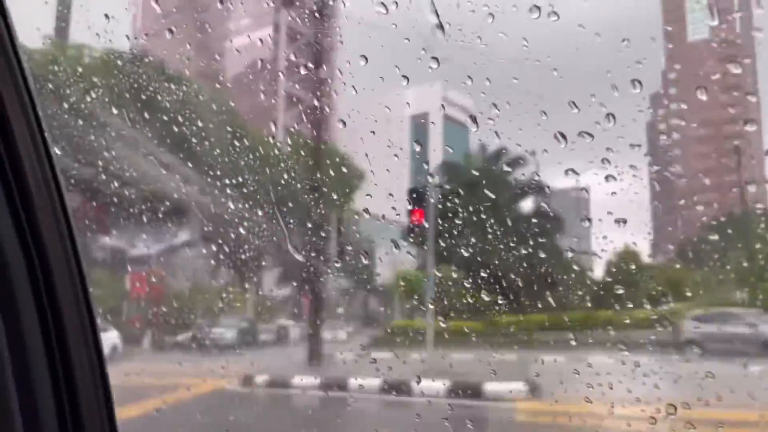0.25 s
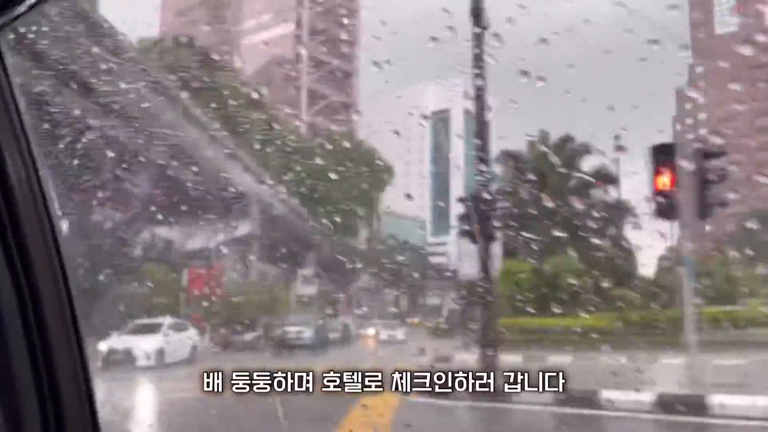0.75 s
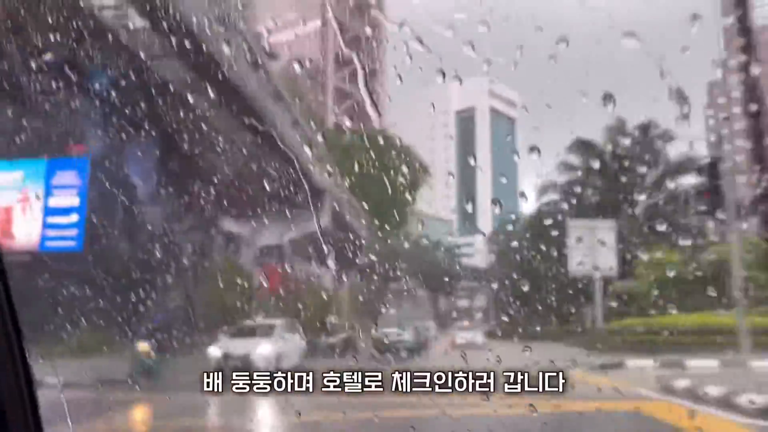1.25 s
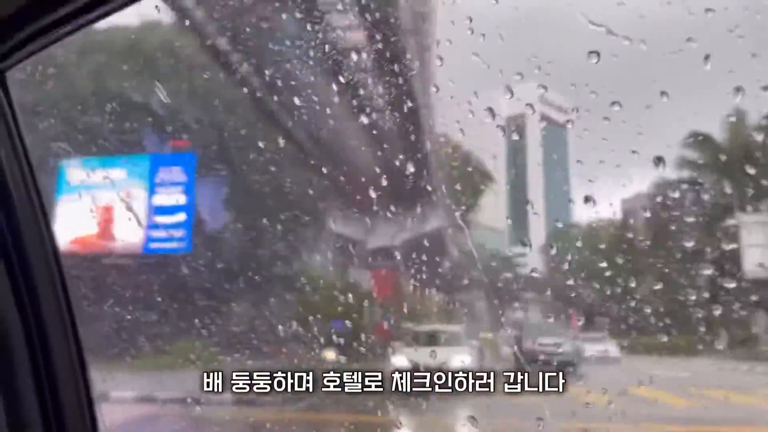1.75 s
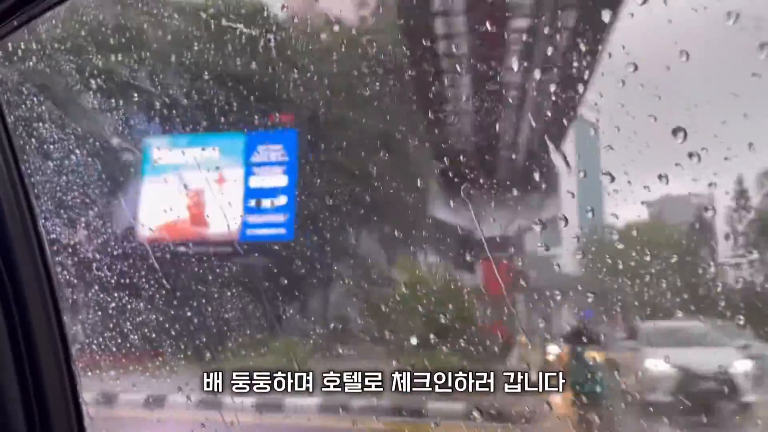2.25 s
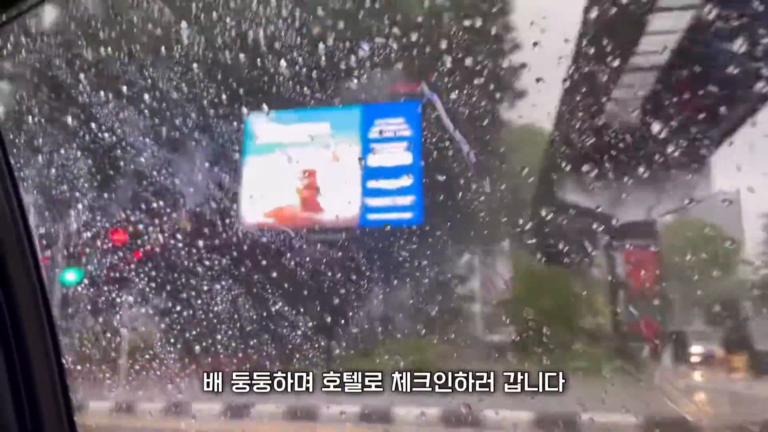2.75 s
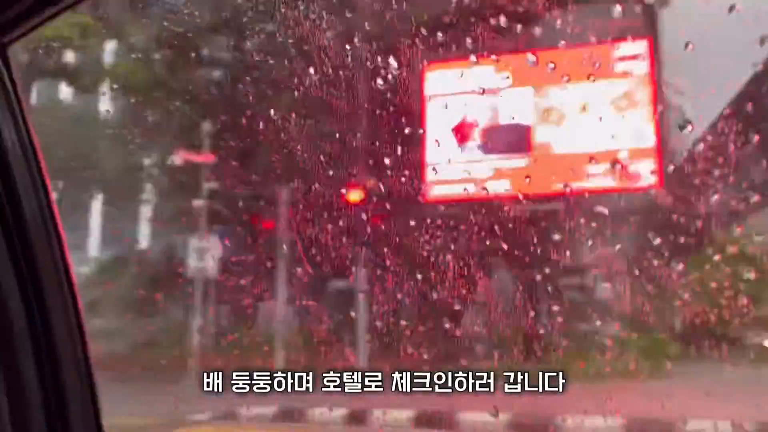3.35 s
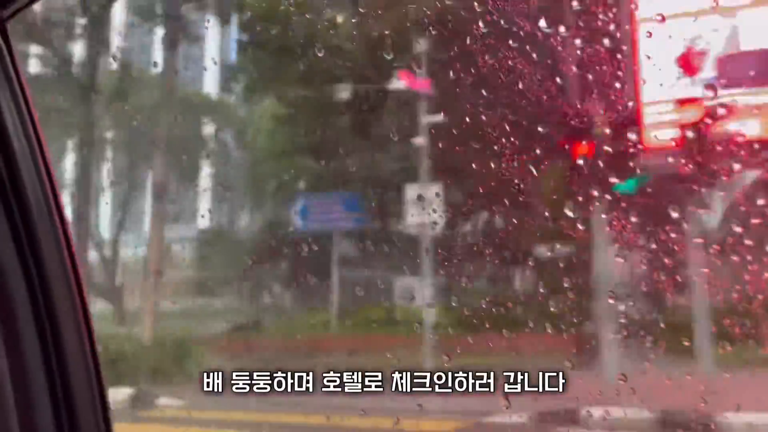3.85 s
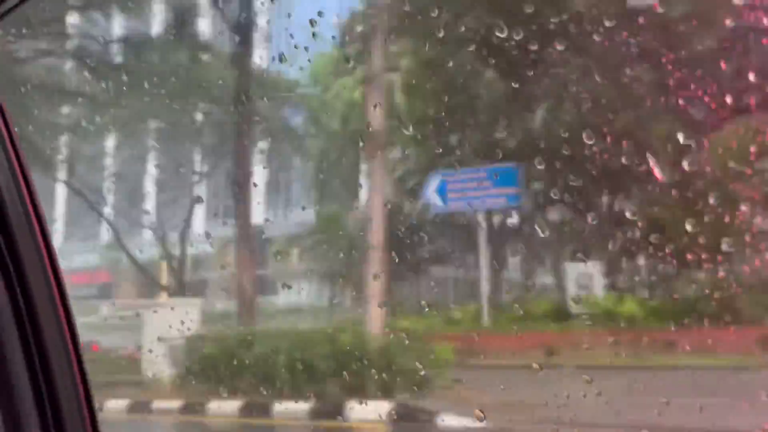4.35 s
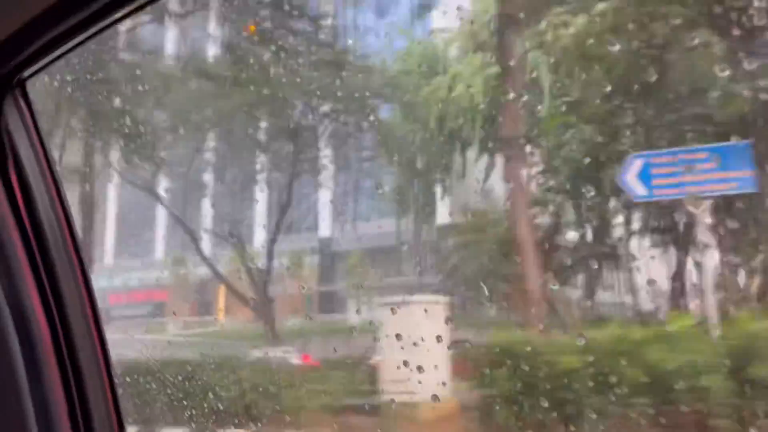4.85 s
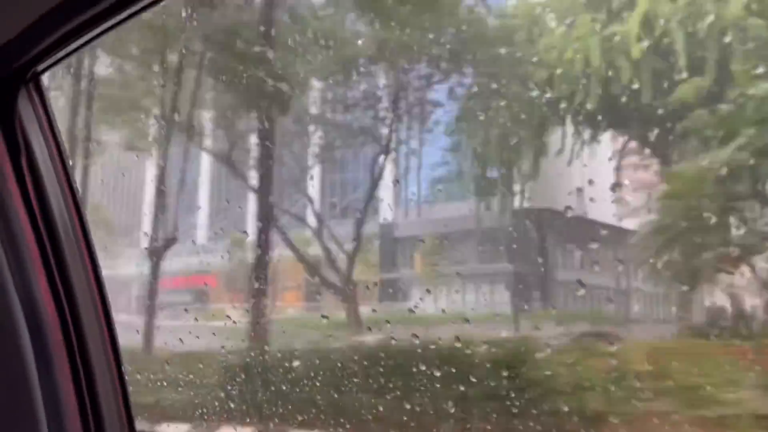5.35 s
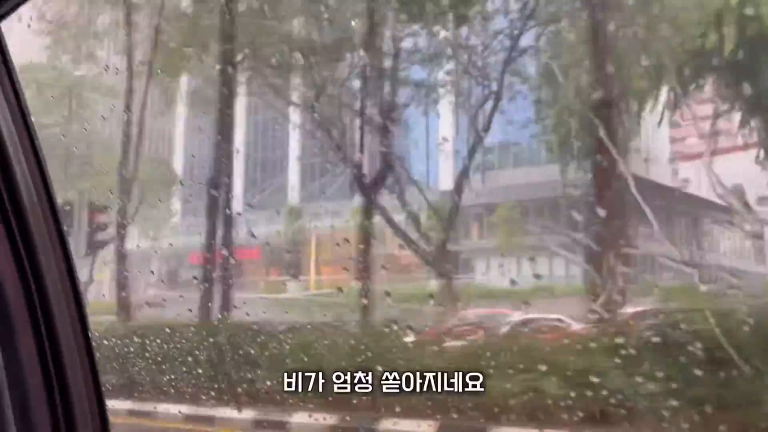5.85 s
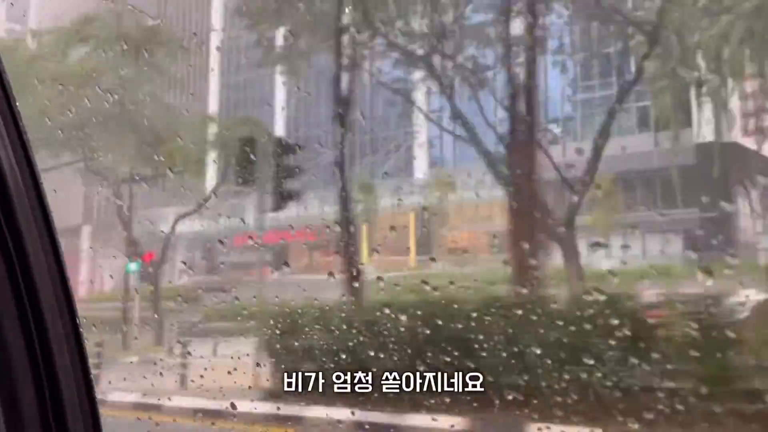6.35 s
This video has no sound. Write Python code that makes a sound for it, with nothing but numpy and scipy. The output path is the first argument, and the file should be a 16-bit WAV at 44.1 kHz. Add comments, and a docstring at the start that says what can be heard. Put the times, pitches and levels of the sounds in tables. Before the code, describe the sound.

Inside a car in heavy rain, dull drumming on the metal roof and brighter patter on glass build over the first second. Tyre roar and a faint low engine hum rise with speed. Around two seconds overhead beams cut the rain in two brief dips, with run-off splashes, then it returns hard. Fat drops tap the near window throughout; close stereo cabin perspective.

```python
"""The cabin of a car in heavy rain, as it pulls through a junction and passes under a viaduct.
Rain drums on the roof and patters on the glass: random impulses excite damped panels. Under the viaduct
it thins and run-off splashes down. Tyre noise drives the cabin's air modes, the engine adds a two-partial
hum, and throbs, knocks and puddles add short swells. Two microphone ports share a frequency-dependent field."""
import sys
import numpy as np
from scipy import signal
from scipy.fft import rfft, irfft, next_fast_len
from scipy.io import wavfile
from scipy.ndimage import uniform_filter1d

SR = 44100
rng = np.random.default_rng(int(sys.argv[2]) if len(sys.argv) > 2 else 0)


def transcribe(signal):
    """Save signal, clipped to [-1, 1], as a 16-bit WAV file at the path in sys.argv[1]."""
    frames = np.atleast_2d(signal).T
    limited = np.clip(frames, -1, 1)
    pcm = np.round(limited * 32767).astype(np.int16)
    wavfile.write(sys.argv[1], SR, pcm)


N = 291296
TIME = np.arange(N) / SR  # s

# Engine pulls under load: [middle t/s, half-width t/s, firing f/Hz, level added to the hum/dB]
ENGINE_PULLS = [(0.48, 0.035, 55.5, -32), (1.31, 0.2, 54.85, -18), (1.655, 0.043, 54.8, -19.5),
                (5.267, 0.031, 59.43, -17.5), (5.474, 0.032, 62.7, -15)]
ENGINE_COAST_DB, ENGINE_OCTAVE_DB = -35.5, -17.5  # hum between pulls; second harmonic re firing tone

# Speed, rising and then varying about cruising: [t/s, share of cruising speed]
SPEED = [(0, 0.29), (.3, 0.5), (.8, 0.6), (1.55, 1.06), (2.1, 0.82), (2.8, 0.98), (3.9, 1.22), (4.5, 0.97),
         (5.7, 1.15), (6.61, 1.1)]
# Tyre roar spectrum: [f/Hz, relative level/dB]
ROAR_SPECTRUM = [(60, -28), (115, 0.5), (145, 4), (168, 1), (195, 4), (240, -3), (275, -2), (330, -5),
                 (435, -11.5), (560, -18), (800, -18), (2000, -36), (8000, -101)]
ROAR_DB, ROAR_FOLLOWS = -25, 0.28  # level at cruising speed; dB per dB of rain, as the road gets wetter
# Cabin air modes, lower then upper: [f/Hz, bandwidth f/Hz, level at cruising speed/dB, power of speed]
AIR_MODES = [(54, 25, -22, 1.4), (95, 27.4, -22, 1.26)]
# Brief changes of the booms: [middle t/s, half-width t/s, lower mode level/dB, upper mode level/dB]
BOOM_CHANGES = [(0.8, 0.063, -6, 3), (1.327, .05, 0, -8), (1.838, 0.048, -6, 3.5), (2.055, 0.017, -8, -2),
                (3.5, 0.027, -6, -5), (4.17, 0.02, -3, -16), (6.005, .03, -12, 3), (6.14, 0.016, -5, -15),
                (6.574, .04, -5, -5)]
# Throbs of the cabin boom: [middle t/s, f/Hz, rms level at the top/dB]
BOOM_THROBS = [(1.789, 96, -18.5), (2.0, 52.3, -18.5), (2.211, 52.36, -21.5), (2.718, 55, -17.5),
               (3.04, 91, -19), (3.101, 49.7, -13), (3.232, 94, -14.5), (3.331, 53, -9),
               (3.571, 101, -18.5), (3.73, 95, -18.5), (3.999, 88, -21), (4.08, 52, -25), (4.291, 95, -17),
               (4.35, 56, -13), (4.57, 52.5, -20), (4.6, 101.7, -16.5), (4.71, 95.5, -16),
               (4.82, 106.6, -15), (4.99, 53.3, -14.5), (5.2, 96.5, -17), (5.7, 95, -17.5), (5.91, 58, -17),
               (6.061, 96, -20.5)]
THROB_HALF_WIDTH_S = 0.038
# Jolts that knock the body: [t/s, level/dB, centre f/Hz of the part that is shaken]
JOLTS = [(0.333, -20, 200), (0.431, -25, 396), (1.588, -24, 186), (2.361, -17, 304), (2.844, -13, 168),
         (4.114, -15, 235), (4.26, -29, 400), (4.398, -18.5, 387), (5.39, -14.5, 310), (5.658, -21.5, 175),
         (6.152, -17, 232)]

# Puddles thrown against the underside: [t/s, level/dB, time to peak t/s]
PUDDLES = [(.6, -26.5, 0.02), (.86, -36, 0.012), (1.27, -32, .08), (1.585, -26, 0.011), (2.345, -27, 0.014),
           (3.565, -23.5, 0.028), (4.645, -24, 0.0072), (5.358, -26, 0.023)]
WASH_LOW_HZ, WASH_S_PER_OCTAVE, WASH_DB_PER_OCTAVE = 850, 0.022, -7.5  # higher bands come later and weaker

# How hard the rain hits the car: [t/s, strength level/dB]
RAIN = [(0, -10.5), (.25, -6), (.53, -4), (.84, 0.5), (.96, -0.5), (1.2, 3), (1.62, 2), (2.4, 4), (2.7, 4),
        (3.1, 0.2), (3.64, 3), (3.81, -1.5), (4.5, 0), (5.02, -3), (5.3, -2.5), (5.46, 0.3), (6.15, 0),
        (6.61, 0)]
# Gusts and lulls in the rain: [middle t/s, half-width t/s, change of level/dB]
GUSTS = [(0.87, 0.02, 2), (0.95, 0.022, -3), (2.911, 0.028, -1), (3.35, 0.013, 2), (3.61, .03, 0),
         (3.783, 0.026, -1.5), (3.995, 0.017, -0.5), (4.087, 0.066, 0.5), (4.72, 0.017, 0.5),
         (5.074, 0.014, -5.5), (5.514, 0.018, 1), (5.603, 0.0097, -1.5), (5.844, 0.037, 0.5),
         (6.202, 0.031, -2)]
# Viaduct beams that shelter the car in turn: [start t/s, end t/s, rain lost level/dB]
BEAMS = [(1.706, 2.012, 11.5), (2.102, 2.293, 15)]
SHELTER_EDGE_S, ROOF_SHELTERED = 0.052, 0.55  # softness of an edge; share of the loss on the long roof

# Small wet drops: pitch range, base level at strength 0, scale of the spread in level
DRIP_LOW_HZ, DRIP_HIGH_HZ, DRIP_DB, DRIP_SPREAD_DB = 1468, 5920, -42.5, 1
# Clearest ringing drops: [t/s, f/Hz, level/dB]
RINGING_DROPS = [(1.609, 5080, -27), (2.017, 3000, -32), (2.066, 3100, -29), (2.255, 3273, -31),
                 (2.425, 4940, -26), (3.011, 5640, -28), (3.127, 3840, -31), (3.258, 3180, -25),
                 (3.503, 4900, -31), (4.137, 4920, -31), (4.417, 3460, -30), (6.045, 4480, -33),
                 (6.428, 4080, -35)]
RINGING_RISE_S = 0.0022  # from landing to peak
# Run-off from the viaduct: [t/s, level/dB, fade t/s to 13 dB down]
RUN_OFF = [(1.843, -24, 0.026), (1.859, -28, 0.021), (1.902, -36.5, 0.018), (2.005, -27.5, 0.022),
           (2.06, -43, .035), (2.095, -49, 0.035), (2.239, -30.5, 0.019), (2.271, -34, 0.023),
           (2.307, -28.5, 0.038)]
# Fattest drops on the near window: [t/s, nominal tap peak level/dB, fine spray level/dB, ring f/Hz]
FAT_DROPS = [(0.3325, -22.5, -49, 2680), (0.4434, -31, -55, 2590), (0.674, -22, -45, 2580),
             (0.88, -23, -52, 3050), (1.0085, -19, -42, 2820), (1.166, -19, -50, 3870),
             (1.2331, -19, -37, 3090), (1.367, -15.5, -46, 4870), (1.441, -26, -50, 2910),
             (1.5364, -23, -50, 2750), (1.6087, -22, -52, 5030), (1.8466, -23, -48, 4870),
             (1.9044, -27, -43, 2590), (2.0176, -24, -42, 3040), (2.067, -21, -51, 3150),
             (2.2776, -20, -34, 4930), (2.3615, -21, -49, 2270), (2.5866, -23, -55, 2810),
             (2.796, -18, -40, 2830), (2.8425, -15, -45, 3460), (2.99, -15, -50, 2930),
             (3.011, -16, -36, 2430), (3.1273, -17, -40, 2930), (3.256, -20.5, -44, 3130),
             (3.29, -20, -52, 3800), (3.3293, -20, -55, 2790), (3.505, -15, -51, 2840),
             (3.8743, -19, -42, 2250), (4.021, -21, -45, 2690), (4.136, -21, -55, 2710),
             (4.3282, -14.5, -46, 3830), (4.4027, -19, -51, 2870), (4.4172, -16, -51, 2800),
             (4.5325, -17, -37, 3500), (4.698, -17, -51, 3530), (4.812, -18, -51, 2980),
             (5.3333, -37, -58, 3097), (5.452, -17.5, -50, 3450), (5.554, -19, -51, 2870),
             (5.865, -19, -52, 3310), (5.9776, -21, -47, 3160), (6.0438, -17.5, -48, 2500),
             (6.2417, -15.5, -45, 3040), (6.293, -18, -45, 2660), (6.3157, -14.5, -49, 3600),
             (6.334, -17, -48, 3200), (6.3764, -22, -52, 3430), (6.4293, -18.5, -50, 4760),
             (6.5896, -17, -44, 2890)]
TAP_CREST_DB, TAP_RING_DB = 9, 6  # peak over the tap's body; how far its ring stands out
# Small drops that burst into spray alone: [t/s, level/dB]
SPRAY_TICKS = [(0.7844, -40), (1.022, -39), (1.206, -42), (2.501, -40), (5.049, -42)]
# Spectrum of taps and splashes: [f/Hz, relative level/dB]
TAP_SPECTRUM = [(300, 10), (1200, -2), (3000, 8), (5200, 4), (7000, -3.5), (10000, -14.5), (16000, -47)]
# Spectrum of the drops' fine spray: [f/Hz, relative level/dB]
SPRAY_SPECTRUM = [(2000, -37), (6000, 2), (9000, -2), (16000, -16)]

# Spectrum of the patter on the glass: [f/Hz, relative level/dB]
GLASS_SPECTRUM = [(500, -2.5), (1450, -26), (2000, -4), (2500, -4.5), (3100, 1.5), (4000, -2.5), (5100, -3),
                  (6000, -7.5), (7000, -10), (8000, -10.5), (9500, -18), (11000, -19.5), (12700, -33),
                  (16000, -36)]
# Spectrum of the even spray hiss on the glass: [f/Hz, relative level/dB]
HISS_SPECTRUM = [(1000, 8), (3000, -11), (6000, -21), (9000, 5.5), (11000, -5), (13000, -5), (16000, -3)]
GLASS_LEVEL_DB, GLASS_FOLLOWS = -35.5, 1  # level at strength 0; dB per dB of rain
# Spectrum of the drumming on the roof: [f/Hz, relative level/dB]
ROOF_SPECTRUM = [(150, -10), (300, 5), (400, 5), (490, 3), (700, -1), (810, -3.5), (900, -4.5),
                 (1150, -3.5), (1280, -9), (1650, -7.5), (2000, -13.5), (3000, -14), (7000, -27),
                 (14000, -88)]
# Ringing modes of the roof panels: [f/Hz, bandwidth f/Hz, lift level/dB]
PANEL_MODES = [(380, 20, 0), (530, 23, -1), (808, 24, 6.5), (1134, 34, 2.5), (1285, 34, 3)]
ROOF_LEVEL_DB, ROOF_FOLLOWS = -26.5, 1.02  # level at strength 0; dB per dB of rain

# In-phase part of the coherence between the ports: [f/Hz, left-right correlation before limiting]
PORT_CORRELATION = [(60, 0.99), (110, 0.94), (200, 0.7), (340, 0.23), (480, 0.51), (620, -0.39),
                    (950, -0.018), (1450, -0.2), (2300, 0.82), (2950, 0.39), (3750, 0.045), (4800, 0.85),
                    (5800, 0.026), (6700, -0.56), (7900, -1.05), (9100, -0.077), (9900, 0.87), (11800, 1),
                    (14000, -1.5)]
# Quadrature part, positive when left leads: [f/Hz, correlation at a quarter cycle]
PORT_QUADRATURE = [(110, -0.016), (340, 0.2), (550, 0.24), (820, -0.083), (1200, 0.354), (2100, -0.28),
                   (3200, -0.046), (4500, 0)]
# Level balance of the ports: [f/Hz, left minus right level/dB]
PORT_BALANCE = [(60, 1.5), (130, -1), (300, 0.5), (385, 4), (490, 1.1), (780, 2), (1000, -0.1), (4000, 0.9),
                (10000, 0)]
CUTOFF_HZ = 15900

MID_ONLY = np.array([[1], [0]])  # feeds the ports' sum, not their difference


def from_db(db):
    """Decibels to amplitude ratio."""
    return 10 ** (np.asarray(db) / 20)


def rms_one(x):
    """Normalisation to unit mean power."""
    return x / np.sqrt(np.mean(x ** 2) + 1e-20)


def in_time(rows):
    """Linear interpolation of each column at every sample."""
    s, *columns = np.transpose(rows)
    return [np.interp(TIME, s, column) for column in columns]


def per_bin(points, size):
    """Interpolation over log frequency at the bins of a transform."""
    hz, values = np.transpose(points)
    bin_hz = np.fft.rfftfreq(size, 1 / SR)
    return np.interp(np.log(bin_hz + 1), np.log(hz), values)


def colour(x, spectrum, size=4096):
    """Minimum-phase filtering by the folded cepstrum; unit energy keeps the power of white noise."""
    cepstrum = irfft(np.log(from_db(per_bin(spectrum, size))))
    cepstrum[1:size // 2] *= 2
    cepstrum[size // 2 + 1:] = 0
    response = irfft(np.exp(rfft(cepstrum)))
    response = response / np.linalg.norm(response)
    return signal.oaconvolve(x, response[None], axes=1)[:, :N]


def drift(rate):
    """Band-limited chance: random knots, rate per second, joined by lines and scaled to unit rms."""
    knots = rng.standard_normal(2048)
    return rms_one(np.interp(TIME * rate, np.arange(len(knots)), knots))


def steady(x, seconds):
    """Division by the running rms: slow swells go and unit power remains."""
    power = uniform_filter1d(np.mean(x ** 2, axis=0), int(seconds * SR))
    return x / np.sqrt(power + 1e-12)


def swell(middle, half_width):
    """Gaussian envelope of height 1; half_width is its standard deviation in seconds."""
    return np.exp(-((TIME - middle) / half_width) ** 2 / 2)


def add(out, s, sound):
    """Superposition of a short sound at a given time."""
    start = int(s * SR)
    out[:, start:start + sound.shape[1]] += sound[:, :N - start]


def panel_ring(ring_t60, cabin_t60, cabin_db, size=4096):
    """Exponential decay of dense modes: the panel's ring plus the padded cabin's short tail, as noise."""
    age = np.arange(size) / SR
    panel = from_db(-60 * age / ring_t60)
    cabin = from_db(cabin_db - 60 * age / cabin_t60)
    return rng.standard_normal((2, size)) * (panel + cabin)


def plink(hz, rise_s, glide_per_s=0):
    """A damped resonator: a sine peaks after rise_s, then dies away, and may rise in pitch."""
    age = TIME[:SR // 40]
    rise = age / rise_s
    return rise * np.exp(1 - rise) * np.sin(2 * np.pi * hz * age * (1 + glide_per_s * age / 2))


def rain_strength():
    """Slow intensity plus gusts and lulls, summed in decibels."""
    rain_db, = in_time(RAIN)
    return rain_db + sum(db * swell(s, half_width) for s, half_width, db in GUSTS)


def shelter():
    """Shadowing by the beams overhead: decibels of rain kept off the car, with soft edges."""
    lost = 0
    for start, end, lost_db in BEAMS:
        entering = np.tanh((TIME - start) / SHELTER_EDGE_S)
        leaving = np.tanh((TIME - end) / SHELTER_EDGE_S)
        lost = lost + lost_db * (entering - leaving) / 2
    return lost


def rainfall(per_s, spread_db, tint_db, ring_t60, cabin_t60, cabin_db, count=14):
    """Shot noise: uneven drops strike random spots of differing modal colour, whose mean is flattened."""
    landed = rng.random(N) < per_s / SR
    sizes = from_db(spread_db * np.minimum(rng.exponential(1, N), 3.5)) * rng.choice([-1, 1], N)
    spot, out, power = rng.integers(0, count, N), 0, 0
    for k in range(count):
        tint = [(hz, rng.normal(0, tint_db)) for hz in np.geomspace(200, 16000, 36)]
        ring = colour(panel_ring(ring_t60, cabin_t60, cabin_db), tint)
        power = power + np.mean(np.abs(rfft(ring, 4096)) ** 2, axis=0)
        hits = landed * sizes * (spot == k)
        out = out + signal.oaconvolve(hits[None], ring, axes=1)[:, :N]
    evening_out = np.column_stack([np.fft.rfftfreq(4096, 1 / SR), -10 * np.log10(power)])[1:]
    return colour(out, evening_out)


def engine():
    """Periodic excitation: the firing tone and its octave waver in pitch and swell as the engine pulls."""
    firing_hz, = in_time([(s, hz) for s, _, hz, _ in ENGINE_PULLS])
    pulls = sum(from_db(db) * swell(s, half_width) for s, half_width, _, db in ENGINE_PULLS)
    load = from_db(ENGINE_COAST_DB) + pulls
    phase = 2 * np.pi * np.cumsum(firing_hz * (1 + 0.017 * drift(14))) / SR
    return load * rms_one(np.sin(phase) + from_db(ENGINE_OCTAVE_DB) * np.sin(2 * phase))


def road():
    """Broadband forcing and resonance: tyre roar and the cabin's air modes grow with speed."""
    speed, = in_time(SPEED)
    rain_db, = in_time(RAIN)
    roar_db = ROAR_DB + ROAR_FOLLOWS * rain_db + 1.5 * drift(22)
    roar = steady(colour(rng.standard_normal((2, N)), ROAR_SPECTRUM), 0.29)
    out = speed * from_db(roar_db) * roar
    for k, (hz, width, cruise_db, growth) in enumerate(AIR_MODES):
        change_db = sum(db[k] * swell(s, half_width) for s, half_width, *db in BOOM_CHANGES)
        shaking = speed ** growth * from_db(cruise_db + change_db)
        # each mode is a narrow, wavering band of noise; the first second lets the filter settle
        mode = signal.butter(2, [hz - width / 2, hz + width / 2], "band", fs=SR, output="sos")
        boom = signal.sosfilt(mode, rng.standard_normal((2, N + SR)))[:, SR:]
        out = out + shaking * np.vstack([steady(part[None], 0.13) for part in boom])
    return out


def throbs():
    """Amplitude-modulated tones: each throb is a brief low swell of a few cycles, of random phase."""
    out = 0
    for s, hz, level_db in BOOM_THROBS:
        tone = np.sin(2 * np.pi * (hz * (TIME - s) + rng.random()))
        out = out + np.sqrt(2) * from_db(level_db) * swell(s, THROB_HALF_WIDTH_S) * tone
    return out


def knocks():
    """Structure-borne impact: dull decaying thuds, each centred on the pitch of the shaken part."""
    thuds = np.zeros((2, N))
    for s, level_db, hz in JOLTS:
        body = [(hz / 4, -22), (hz / 1.5, -7), (hz, 0), (hz * 1.6, -7), (hz * 4, -26), (hz * 30, -80)]
        thud = colour(panel_ring(ring_t60=0.097, cabin_t60=0.085, cabin_db=-9), body)
        add(thuds, s, from_db(level_db) * thud)
    return thuds


def puddles(count=6):
    """Break-up of a water sheet into finer spray: noise bands enter in turn, a wash that sweeps upward."""
    out, age = np.zeros((2, N)), TIME[:SR // 4]
    for s, level_db, peak_s in PUDDLES:
        envelope = age / peak_s * np.exp(1 - age / peak_s)
        for octave in np.arange(count) / 3:
            hz = WASH_LOW_HZ * 2 ** octave
            band = signal.butter(2, [hz / 1.15, hz * 1.15], "band", fs=SR, output="sos")
            wash = rms_one(signal.sosfilt(band, rng.standard_normal((2, len(age)))))
            gain = from_db(level_db + WASH_DB_PER_OCTAVE * octave) / np.sqrt(count)
            add(out, s + WASH_S_PER_OCTAVE * octave, gain * envelope * wash)
    return out


def drips(count=800):
    """Bubble resonance: drops trap bubbles in the water film, of random size, place and rising pitch."""
    out, strength_db = np.zeros((2, N)), rain_strength() - shelter()
    for when, pitch, size, place, damping in rng.random((count, 5)):
        hz = DRIP_LOW_HZ * (DRIP_HIGH_HZ / DRIP_LOW_HZ) ** pitch
        level_db = DRIP_DB + strength_db[int(when * N)] - DRIP_SPREAD_DB * np.log(size + 0.03)
        ring = plink(hz, (2.5 + 4 * damping) / hz, glide_per_s=6)
        angle = 2 * np.pi * place
        mid_side = np.sqrt(2) * np.array([[np.cos(angle)], [np.sin(angle)]])
        add(out, when * TIME[-1], from_db(level_db) * ring * mid_side)
    return out


def plinks():
    """Free damped oscillation at a fixed pitch: the clearest ringing drops."""
    out = np.zeros((2, N))
    for s, hz, level_db in RINGING_DROPS:
        add(out, s, from_db(level_db) * plink(hz, RINGING_RISE_S) * MID_ONLY)
    return out


def splashes():
    """Superposed random impacts: run-off bursts on the glass into a fading spatter of ticks and rings."""
    spatter, age = np.zeros((2, N)), TIME[:SR // 10]
    for s, level_db, fade_s in RUN_OFF:
        droplets = (rng.random(len(age)) < 1500 / SR) * rng.uniform(0, 1, len(age))
        # the ticks overlap, so their powers add; power decays with a 0.5 ms time constant
        power = signal.lfilter([1], [1, -np.exp(-1 / (0.0005 * SR))], droplets)
        ticks = rms_one(np.sqrt(power)) * rng.standard_normal((2, len(age)))
        rings = np.zeros((2, N))
        for delay, pitch, first, second in rng.random((40, 4)):
            weights = np.array([[first - 0.5], [second - 0.5]])
            add(rings, delay * age[-1], plink(3000 * 2 ** pitch, 0.001) * weights)
        fade = (1 - np.exp(-age / 0.0011)) * np.exp(-1.5 * (age / fade_s) ** 2)
        burst = rms_one(ticks + from_db(-15) * rms_one(rings[:, :len(age)]))
        add(spatter, s, from_db(level_db) * fade * burst)
    return colour(spatter, TAP_SPECTRUM)


def fat_drops():
    """Impulse response of the glass: hard taps ring at the pitch of the spot hit, with ticks of spray."""
    taps, spray = np.zeros((2, 2, N))
    for s, peak_db, _, hz in FAT_DROPS:
        spot = [(hz / 1.25, 0), (hz, TAP_RING_DB), (hz * 1.25, 0)]
        tap = colour(panel_ring(ring_t60=0.022, cabin_t60=0.1, cabin_db=-13), spot)
        add(taps, s, from_db(peak_db - TAP_CREST_DB) * tap)
    for s, spray_db in [(s, db) for s, _, db, _ in FAT_DROPS] + list(SPRAY_TICKS):
        add(spray, s, from_db(spray_db) * panel_ring(ring_t60=0.02, cabin_t60=0.11, cabin_db=-5))
    return colour(taps, TAP_SPECTRUM) + colour(spray, SPRAY_SPECTRUM)


def windows():
    """Shot noise on stiff glass: harder rain brings more drops, in flurries, over an even spray hiss."""
    strength_db = GLASS_FOLLOWS * rain_strength() - shelter()
    per_s = 720 * from_db(0.3 * strength_db + 3 * drift(22))
    patter = rainfall(per_s, spread_db=4.2, tint_db=6.5, ring_t60=0.021, cabin_t60=0.08, cabin_db=-13,
                      count=18)
    patter = steady(colour(patter, GLASS_SPECTRUM), 0.24)
    hiss = from_db(0.53 * drift(40)) * colour(rng.standard_normal((2, N)), HISS_SPECTRUM)
    return from_db(GLASS_LEVEL_DB + strength_db) * (from_db(-2.5) * patter + from_db(-17) * hiss)


def roof():
    """Modal response of lined steel: rain gives a duller, longer drumming in which panel modes ring on."""
    strength_db = ROOF_FOLLOWS * rain_strength() - ROOF_SHELTERED * shelter()
    per_s = 1100 * from_db(strength_db / 2 + 2 * drift(25))
    drumming = rainfall(per_s, spread_db=2, tint_db=5.5, ring_t60=0.04, cabin_t60=0.24, cabin_db=-13,
                        count=9)
    for hz, width, lift_db in PANEL_MODES:
        ringing = signal.lfilter(*signal.iirpeak(hz, hz / width, fs=SR), drumming)
        drumming = drumming + (from_db(lift_db) - 1) * ringing
    return from_db(ROOF_LEVEL_DB + strength_db) * steady(colour(drumming, ROOF_SPECTRUM), 0.12)


def scene():
    """Superposition of all sources, as the mid and side components of the cabin field."""
    car = (engine() + throbs()) * MID_ONLY + road() + knocks() + puddles()
    rain = drips() + plinks() + splashes() + fat_drops() + windows() + roof()
    return car + rain


def record(dry):
    """Complex coherence: sum and difference set the ports' likeness, phase their lead; the top is cut."""
    size = next_fast_len(N + SR // 10)
    coherence = per_bin(PORT_CORRELATION, size) + 1j * per_bin(PORT_QUADRATURE, size)
    alike = np.minimum(np.abs(coherence), 0.98)
    lead = uniform_filter1d(np.unwrap(np.angle(coherence)), size=600)
    mid, side = rfft(dry, size) * np.sqrt([(1 + alike) / 2, (1 - alike) / 2])
    # half of the level and phase difference goes to each port
    lean = from_db(per_bin(PORT_BALANCE, size) / 2) * np.exp(1j * lead / 2)
    ports = irfft(np.array([(mid + side) * lean, (mid - side) / lean]), size)[:, :N]
    low_pass = signal.ellip(10, 0.1, 90, CUTOFF_HZ, fs=SR, output="sos")
    return signal.sosfilt(low_pass, ports)


dry = scene()
out = record(dry)
transcribe(out)
```